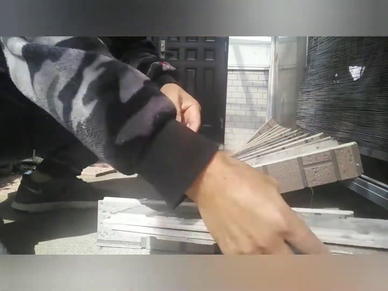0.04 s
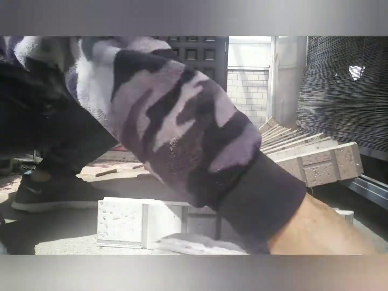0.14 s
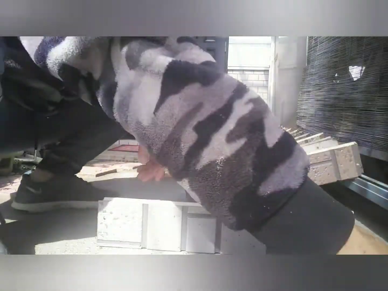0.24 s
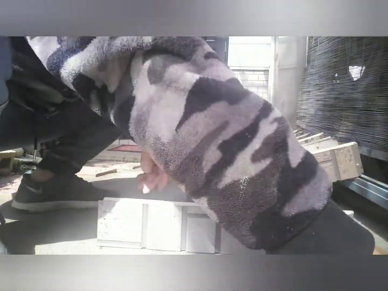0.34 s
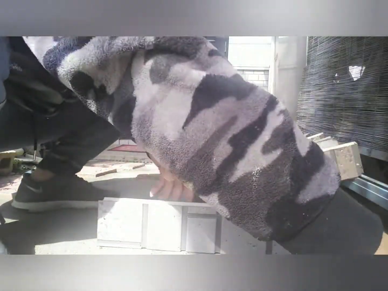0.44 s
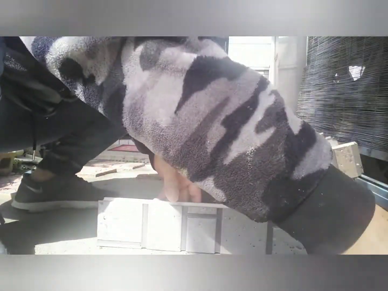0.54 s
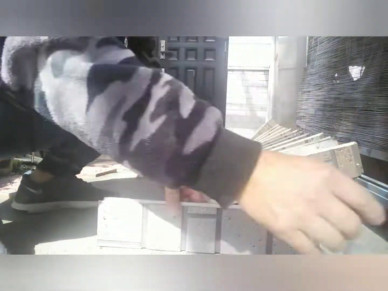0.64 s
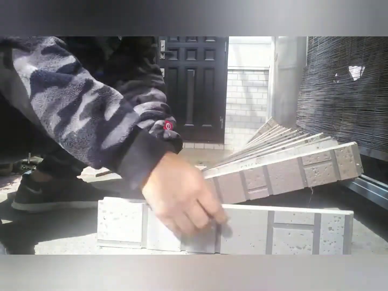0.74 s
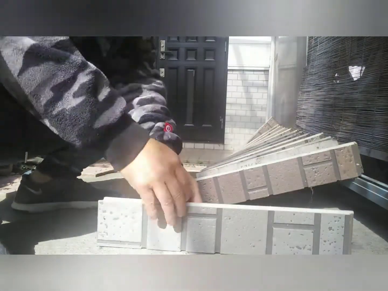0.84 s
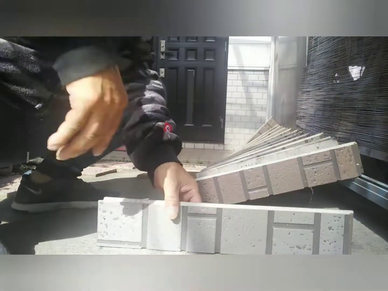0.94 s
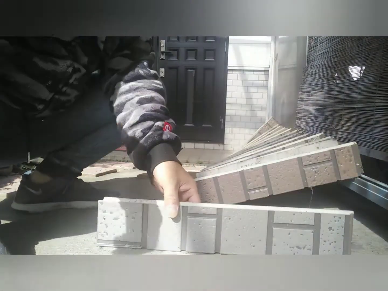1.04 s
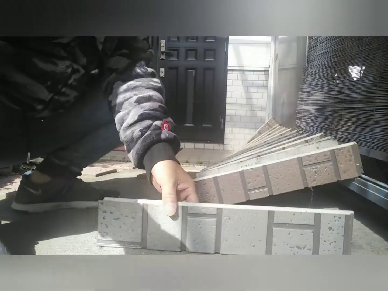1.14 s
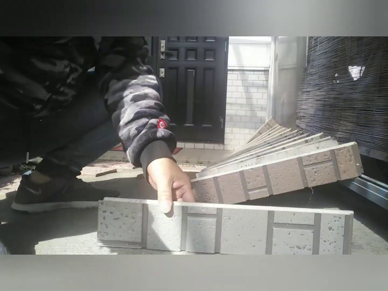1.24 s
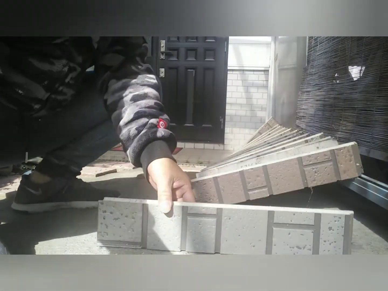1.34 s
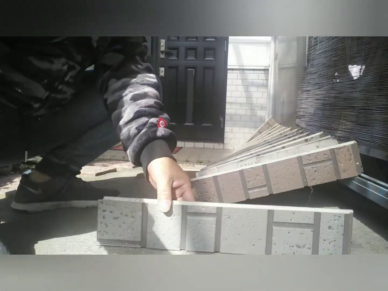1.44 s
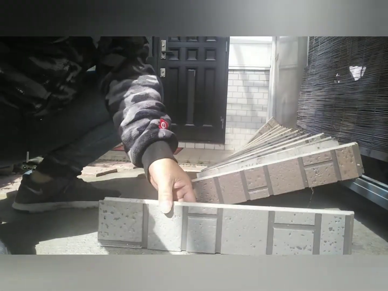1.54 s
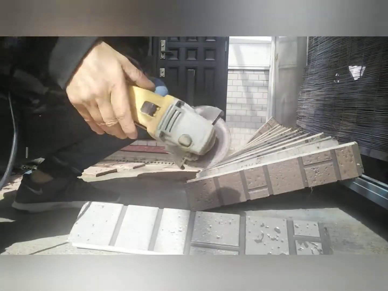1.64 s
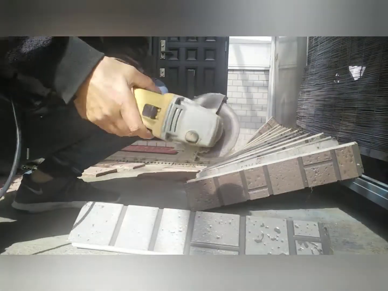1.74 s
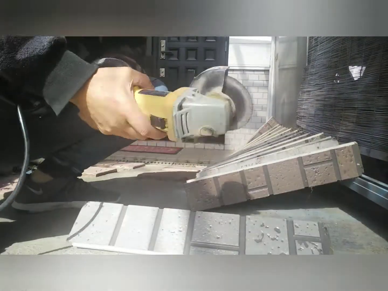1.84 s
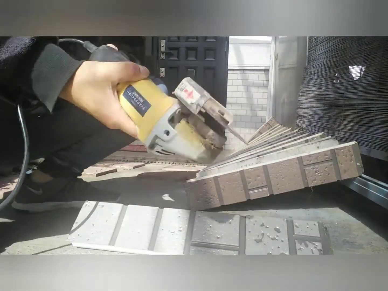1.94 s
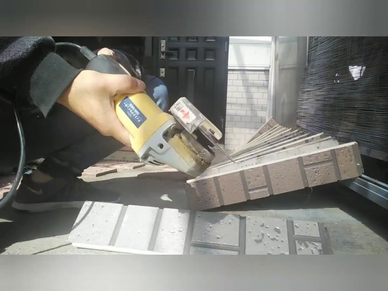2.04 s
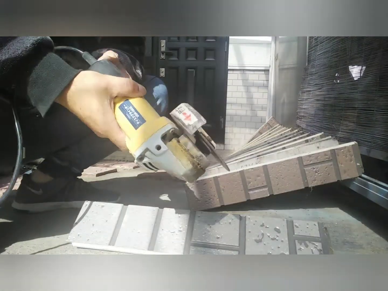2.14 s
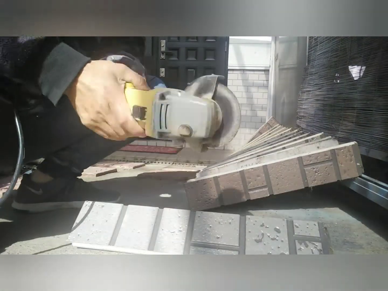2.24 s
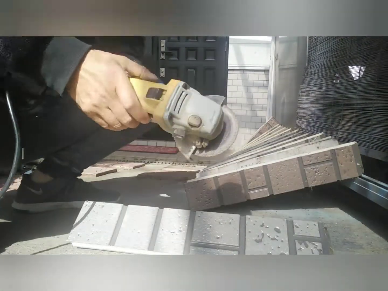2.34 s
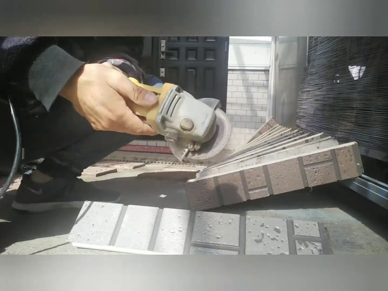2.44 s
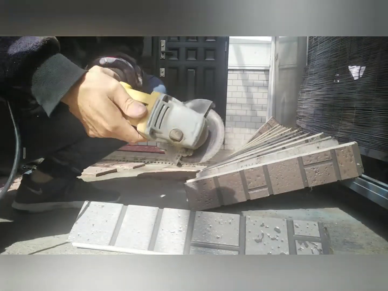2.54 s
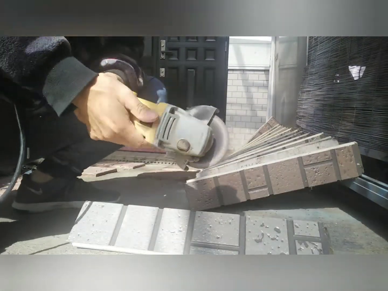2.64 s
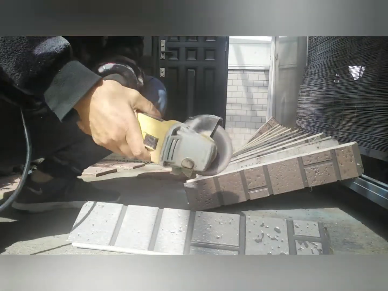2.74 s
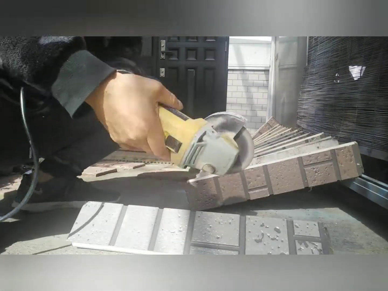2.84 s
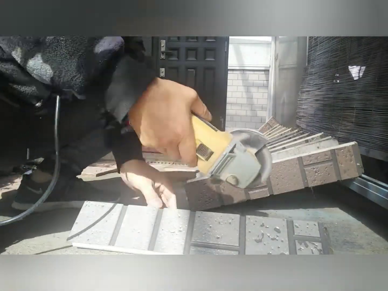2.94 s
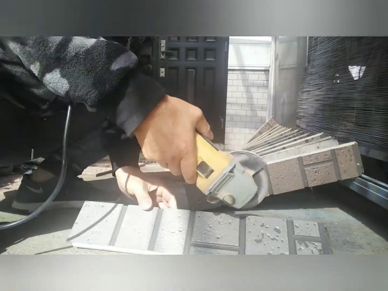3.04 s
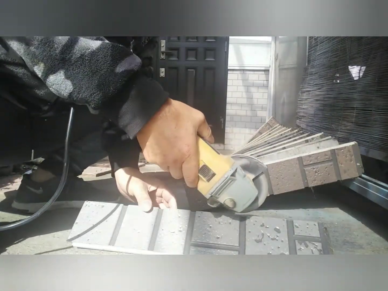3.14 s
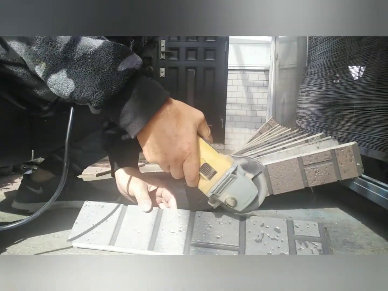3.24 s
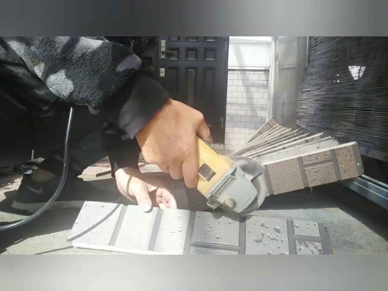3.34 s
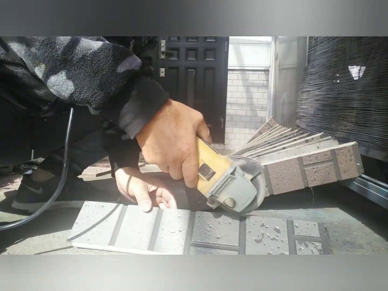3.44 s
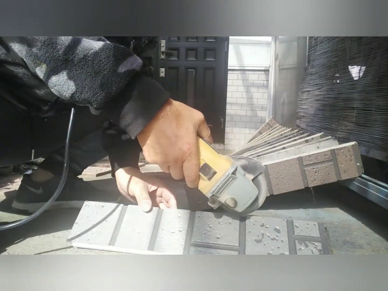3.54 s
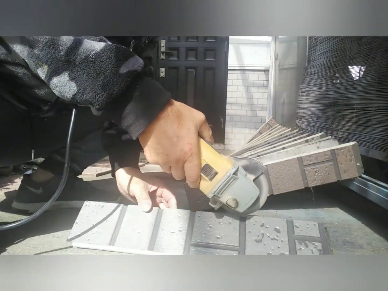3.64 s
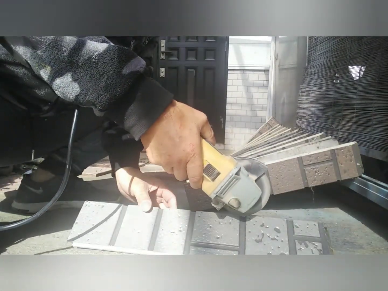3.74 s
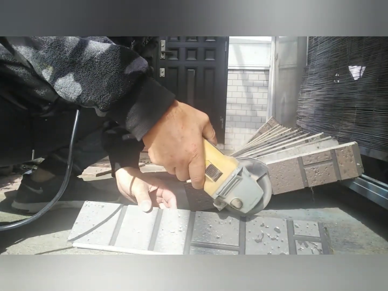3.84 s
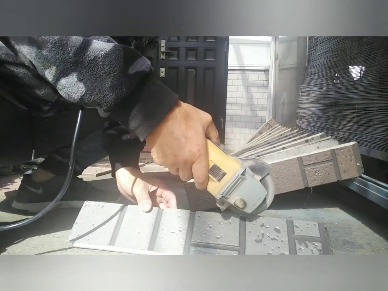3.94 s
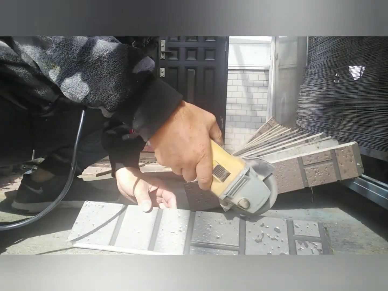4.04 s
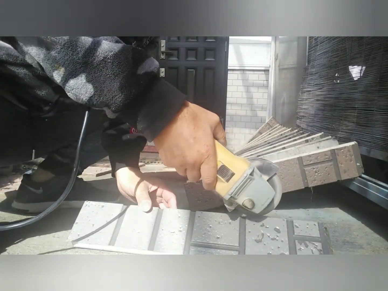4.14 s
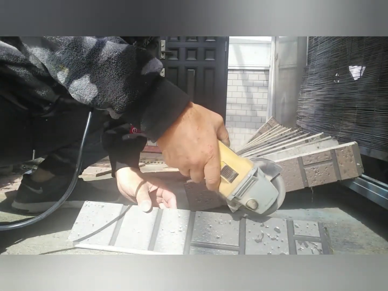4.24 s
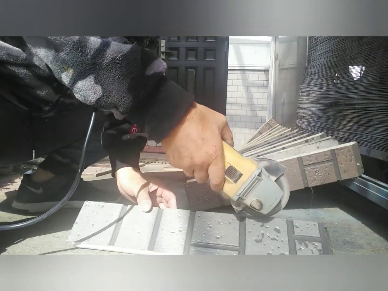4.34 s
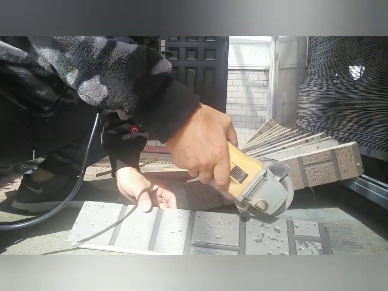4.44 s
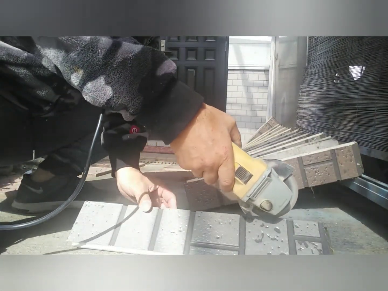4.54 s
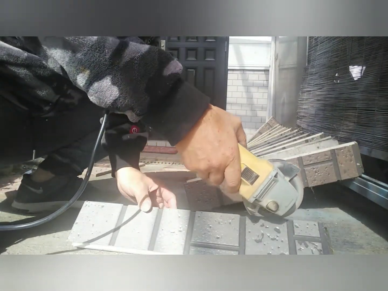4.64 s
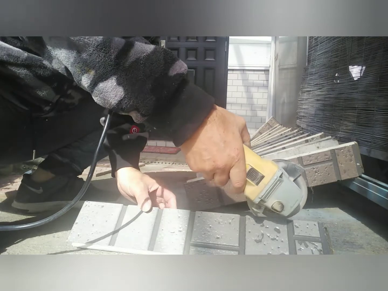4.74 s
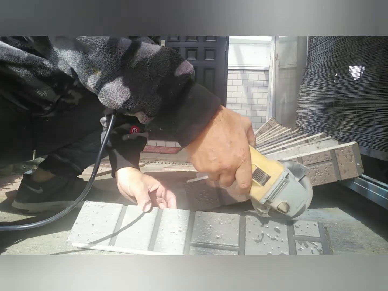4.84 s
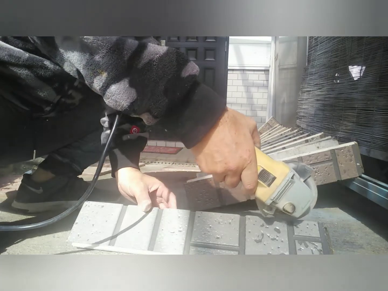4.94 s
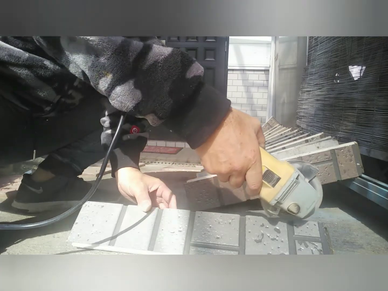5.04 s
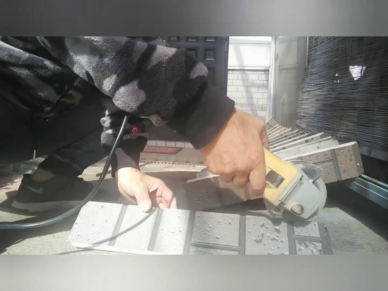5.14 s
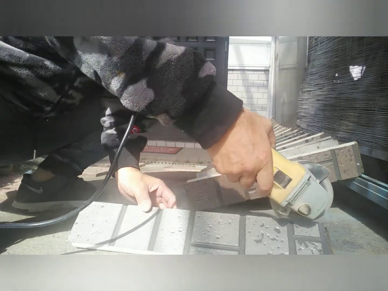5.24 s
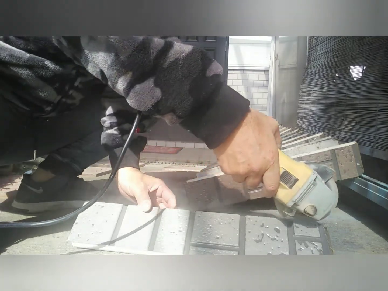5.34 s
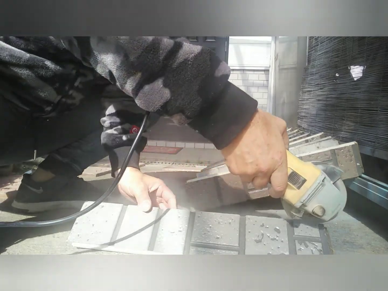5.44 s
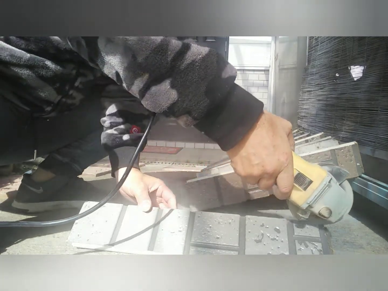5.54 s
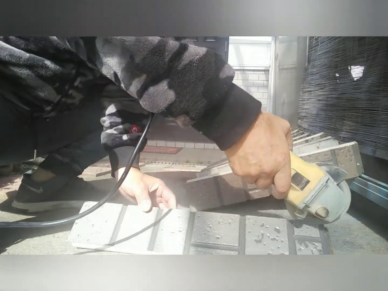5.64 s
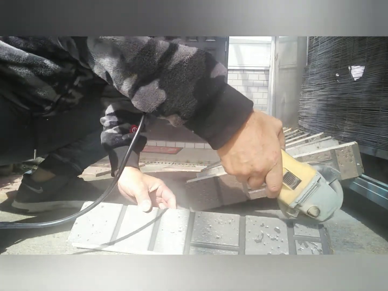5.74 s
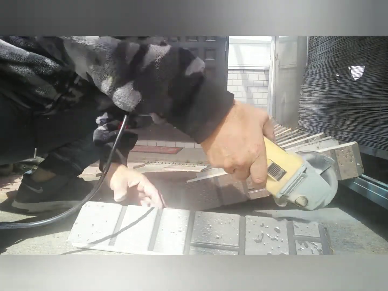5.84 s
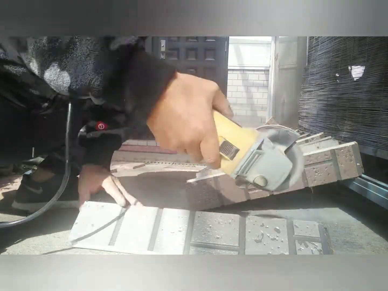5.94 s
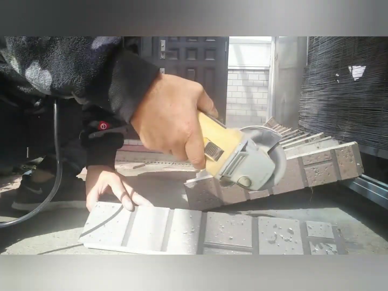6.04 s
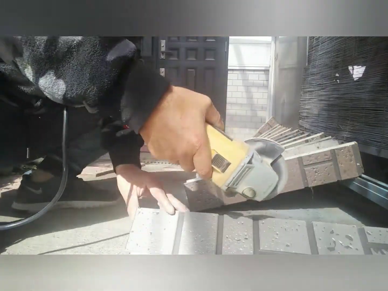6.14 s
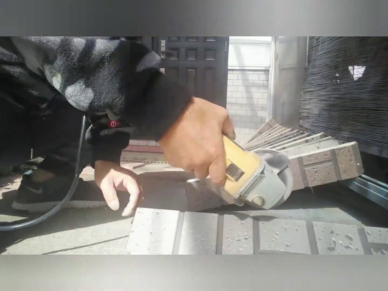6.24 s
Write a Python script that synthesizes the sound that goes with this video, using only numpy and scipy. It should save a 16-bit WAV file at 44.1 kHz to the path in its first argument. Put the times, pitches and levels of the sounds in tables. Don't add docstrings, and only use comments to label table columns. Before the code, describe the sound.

Faint thuds, clicks and gritty slides of siding boards over soft yard noise, ending in a bright hard clack. A momentary gap, then a calm second with light rustles. An angle grinder starts abruptly, far louder, its whine climbing and gears chattering; the disc snarls and stutters through a board, slowing, then runs free and briefly brushes it. Dry, close, mono.

```python
import sys
import numpy as np
from scipy import signal
from scipy.fft import rfft, irfft
from scipy.io import wavfile
from scipy.ndimage import uniform_filter1d

SR = 44100
rng = np.random.default_rng(int(sys.argv[2]) if len(sys.argv) > 2 else 0)


def transcribe(signal):
    frames = np.atleast_2d(signal).T
    limited = np.clip(frames, -1, 1)
    pcm = np.round(limited * 32767).astype(np.int16)
    wavfile.write(sys.argv[1], SR, pcm)


def decibels_to_gain(level_db):
    exponent = np.asarray(level_db, float) / 20
    return 10 ** exponent


N = 277830
T = np.arange(N) / SR

# time_s, bite_db on the board, nearness_db of the tool
WORK = [(2.575, -60, -5.5), (2.63, -42, 0), (3.05, -43.5, 1), (3.35, -34, 0), (3.56, -33.5, 1),
        (3.86, -27.5, 2.05), (4.17, -22, .7), (4.6, -21.5, -0.3), (5.0, -21.5, 0), (5.25, -22.5, 0),
        (5.46, -19.5, -0.8), (5.61, -23, 0.6), (5.77, -23.5, 1.2), (5.83, -50, -0.5), (6.0, -41, -0.5),
        (6.06, -31, -1), (6.13, -43, 0.2), (6.3, -48, 0)]
# time_s, loss_hz
SAG = [(3.52, 1), (3.8, 13), (4.05, 24), (4.25, 37), (4.4, 40), (4.55, 47), (4.68, 54), (4.85, 59),
       (4.98, 65), (5.1, 75), (5.22, 80), (5.3, 90), (5.46, 105), (5.55, 94), (5.6, 81), (5.65, 75),
       (5.72, 80), (5.785, 81)]
# time_s, fan_lift_db, commutator_lift_db
TONE_LIFT = [(2.62, -24, -10), (2.66, -24, 0), (2.74, -22, 2), (2.79, -1, 3), (2.95, 0, 3), (3.1, 0, -3),
             (3.5, 0, -3), (3.62, 0, 0), (5.55, 0, 0), (5.65, 0, 1), (5.85, -1, 0), (5.95, -3, -1),
             (6.1, -5, -3), (6.3, -6, 0)]
# pitch_hz, level_db
UNBALANCE = [(280, -65), (335, -48), (365, -35), (395, -36), (415, -30), (435, -36), (452, -38), (468, -35)]
FAN = [(1900, -44), (2500, -57), (2650, -33), (2750, -40.5), (2900, -27.5), (3000, -37.5), (3120, -43),
       (3270, -32)]
COMMUTATOR = [(4350, -35), (4520, -34), (4620, -39), (4800, -41), (5000, -43), (5300, -46), (5480, -40),
              (5600, -36)]
# armature_multiple, level_db
FAINT_ORDERS = [
    (2, -52.5),
    (4, -43.5),
    (5, -52),
    (13, -57),
]
# start_s, end_s, armature_multiple, level_db
SWEEPS = [
    (2.615, 2.656, 12, -35),
    (5.25, 5.5, 14, -37),
    (5.79, 5.923, 5, -42.5),
    (5.82, 6.1, 13, -39),
    (5.94, 6.2, 8, -40),
]
# pitch_hz, density_db per Hz
HOUSING = [(150, -56), (250, -21.5), (419, -13), (458, -17), (515, -21), (633, -12), (876, -21),
           (1380, -14), (3160, -6.5), (3460, -12), (5000, -13.5), (5620, -7.5), (6910, -24.5), (8500, -26),
           (11000, -15), (18700, -120)]
# pitch_hz, density_db per Hz
GRIT = [
    (5500, -47),
    (6500, -12),
    (7200, -12),
    (8500, -8.5),
    (10000, -4.5),
    (11400, 4.5),
    (12500, -2.5),
    (14000, -7),
    (16000, -10),
]
# pitch_hz, width_hz,
# level_db
BOARD = [(594, 247, -2), (727, 180, -2.5), (799, 88, 1), (1152, 220, -6.5), (1728, 205, -7.5),
         (2500, 280, -4), (4980, 410, -9), (6290, 350, -10)]
# pitch_hz, width_hz, level_db
STEEL = [(5280, 200, -19), (5750, 300, -15), (9300, 400, -22), (10750, 500, -12), (11800, 500, -12),
         (12900, 600, -14), (14000, 600, -15), (15200, 600, -13)]
# start_s, end_s, disc_multiple, level_db
DRUM = [(3.72, 4.1, 4, -38.5), (3.9, 4.55, 4, -31), (4.39, 5.35, 4, -35), (5.3, 5.62, 4, -29),
        (5.6, 5.8, 4, -37), (4.05, 4.93, 3.5, -39), (5.05, 5.45, 4.5, -39.5), (4.2, 4.5, 5, -41),
        (4.42, 4.95, 5, -31), (3.7, 4.05, 10.5, -42.5), (4.9, 5.15, 7.5, -43), (4.9, 5.3, 5, -36.5),
        (5.62, 5.8, 5, -36), (4.8, 5.0, 5.5, -37), (5.05, 5.35, 5.5, -40), (5.64, 5.78, 5.5, -38),
        (4.05, 4.3, 6, -39), (5.32, 5.6, 6, -27), (5.68, 5.8, 6, -43), (5.25, 5.45, 6.5, -41),
        (4.0, 4.7, 7, -37.5), (4.72, 4.9, 7, -39), (5.05, 5.55, 7, -43), (5.1, 5.6, 8, -39),
        (5.62, 5.82, 8, -39.5), (5.33, 5.6, 9, -34.5), (4.05, 4.61, 10, -39.5), (4.05, 4.5, 11, -39),
        (4.5, 5.0, 11, -36), (3.75, 4.73, 13, -39.5), (5.35, 5.6, 13, -41), (5.62, 5.8, 12, -37.5),
        (3.56, 3.85, 14, -33), (3.9, 4.05, 14, -37), (4.55, 4.7, 14, -39), (4.35, 4.7, 15, -41),
        (5.02, 5.28, 15, -35.5), (4.05, 4.5, 16, -38.5), (4.45, 5.0, 16, -37), (3.75, 4.15, 17, -36),
        (4.65, 5.0, 17, -39), (5.12, 5.35, 17, -40), (4.42, 4.58, 18, -34), (5.25, 5.55, 18, -35.5),
        (5.35, 5.6, 19, -35.5), (5.7, 5.82, 18, -33)]
# time_s, peak_db
GEAR_KNOCKS = [(2.5803, -22), (2.5903, -14), (2.6302, -15), (2.7526, -10), (2.7699, -13), (2.7968, -12),
               (2.8158, -14), (2.8747, -15), (2.8951, -12), (2.904, -16), (2.9213, -12), (2.9839, -16),
               (3.0737, -16), (3.1236, -17), (3.1905, -16), (3.2154, -19), (3.288, -17), (3.3735, -10),
               (3.4174, -15), (3.4948, -10), (3.638, -15), (3.6559, -14), (3.7053, -12), (3.804, -12),
               (5.858, -17),
    (5.958, -17),
    (6.046, -17),
    (6.205, -21),
]
# time_s, peak_db
SNATCHES = [(3.786, -18), (3.805, -14), (3.822, -16), (3.846, -12), (3.89, -18), (3.914, -12.5),
            (3.981, -17), (4.009, -17), (4.035, -14), (4.05, -12), (4.097, -14), (4.12, -12), (4.145, -13),
            (4.192, -15), (4.21, -8), (4.254, -15), (4.291, -14), (4.331, -11), (4.351, -11), (4.422, -16),
            (4.447, -13), (4.474, -14), (4.498, -9), (4.519, -11), (4.615, -15), (4.638, -8), (4.681, -12),
            (4.702, -8), (4.742, -25), (4.755, -8.5), (4.794, -13), (4.821, -9), (4.84, -12), (4.864, -12),
            (4.912, -16), (4.929, -10.5), (4.961, -12), (4.981, -8), (5.005, -12), (5.029, -13),
            (5.054, -9.5), (5.14, -9), (5.168, -10), (5.28, -17), (5.307, -14), (5.327, -10), (5.422, -7),
            (5.451, -10), (5.466, -10), (5.49, -10), (5.513, -8), (5.64, -13), (5.675, -12), (5.704, -15),
            (5.745, -12), (5.793, -15)]
# time_s, lift_db
GUSTS = [
    (3.345, 6),
    (3.86, 5.5),
    (4.7, 6.5),
    (4.93, 6),
    (5.35, 0.5),
]
# time_s, peak_db, thud_hz, ring_hz, crack_db
KNOCKS = [(0.279, -35, 290, 2640, -16), (0.288, -20, 520, 583, -9), (0.292, -22, 334, 692, -11),
          (0.461, -39, 164, 1810, -13), (0.49, -40, 170, 824, -15), (0.516, -23, 233, 2330, -4),
          (0.527, -34, 549, 1860, -6), (0.546, -36, 261, 660, -9.5), (0.611, -56, 151, 851, -13),
          (0.796, -43, 151, 706, -0.5), (0.915, -34, 236, 705, -17.5), (0.951, -49, 239, 608, -32),
          (1.004, -37, 220, 700, -24), (1.348, -46, 186, 550, -22)]
# pitch_hz, density_db per Hz
CRACK = [(240, -48), (400, -13), (1430, -2), (2380, -2), (3000, -5.5), (5720, -7), (7670, -44),
         (11100, -26.5), (15800, -40)]
# pitch_hz, level_db, t60_s
DROP = [(550, -1.5, 0.033), (1200, -14, 0.024), (2190, 0, 0.031), (3780, -14, 0.022), (4530, -12, .02),
        (6380, -2, 0.019), (11100, -0.5, 0.02), (11260, -5, 0.024)]
# start_s, end_s, pitch_hz, width_hz, level_db
SCRAPES = [(0.281, 0.284, 1657, 2500, -54), (0.306, 0.333, 600, 800, -60), (0.42, 0.474, 4700, 1200, -58),
           (0.443, 0.513, 1200, 1600, -57.5), (0.514, 0.574, 800, 900, -53.5),
           (0.597, 0.755, 836, 300, -62), (.92, 0.996, 300, 280, -57), (1.095, 1.321, 830, 900, -75),
           (1.12, 1.25, 4500, 1000, -76), (1.382, 1.441, 67, 50, -38.5), (1.386, 1.48, 296.3, 407.4, -53),
           (1, 1.025, 790, 400, -55), (1.42, 1.475, 140, 151.2, -44), (-.05, 0.074, 900, 1200, -71),
           (0.79, 0.822, 3520, 2500, -51), (0.794, 0.83, 700, 138.9, -57), (1.37, 1.416, 1990, 600, -70),
           (1.438, 1.477, 2250, 250, -58), (1.439, 1.47, 1200, 400, -62), (1.415, 1.45, 5600, 1200, -68),
           (1.508, 1.548, 450, 400, -55), (1.51, 1.552, 2000, 500, -64)]
# start_s, end_s, pitch_hz, width_hz, level_db
BRUSH = [
    (6.025, 6.115, 660, 170, -29),
    (6.02, 6.11, 830, 150, -34),
    (6.03, 6.12, 1120, 120, -42),
]
# start_s, end_s, level_db
RUSTLES = [(-.06, 0.106, -68.5), (.33, .38, -59), (0.366, 0.485, -62), (0.486, 0.587, -59),
           (0.576, 0.784, -65), (0.78, 0.974, -63.5), (1.087, 1.34, -70), (1.39, 1.474, -73),
           (1.48, 1.58, -74), (1.59, 1.747, -77), (1.75, 1.802, -66), (1.788, 1.892, -67.5),
           (2.17, 2.243, -71), (2.22, 2.352, -72.5), (2.382, 2.459, -69.5)]
# pitch_hz, density_db per Hz
RUSTLE = [(760, -42.5), (1300, -19), (1440, -2), (3770, 1.5), (5010, 4.5), (7760, -14.5), (11100, 7.5),
          (13400, -8), (15000, -19), (15800, -46)]
# time_s, level_db
BUMPS = [(.298, -52), (.538, -59), (.618, -59), (.824, -65), (1.02, -55), (1.398, -49), (1.505, -44),
         (1.73, -69), (1.87, -64), (2.42, -71), (2.535, -60)]
# pitch_hz, density_db per Hz
YARD = [(18, -50.5), (30, -19), (79, -5), (165, -16.5), (382, -23), (435, -27.5), (755, -28.5), (883, -28),
        (955, -32), (6650, -43.5), (13500, -34), (14600, -26), (15800, -28.5)]
BUSY = [(88, -34.5), (150, -7.5), (543, -15), (1050, -17), (1250, -23), (3880, -25), (7250, -41),
        (10900, -20.5), (13500, -24), (14600, -14.5), (15800, -24.5)]
# start_s, end_s
SCENE_GAP = (1.577, 1.601)

DISC_RATIO = .3826
START_S, RELEASE_S = 2.575, 5.785


def grinder():
    hz = speed()
    bite_db, near_db = curves(WORK)
    bite_db = bite_db + 0.72 * walk(18)
    turns = np.cumsum(hz) / SR
    disc_turns = DISC_RATIO * turns
    knock_db = clatter(disc_turns, bite_db)

    unbalance_db = radiated(hz, UNBALANCE) + near_db
    fan_db = radiated(7 * hz, FAN) + near_db
    commutator_db = radiated(12 * hz, COMMUTATOR) + near_db
    free = np.clip(-(bite_db + 32) / 6, 0, 1)
    commutator_db += (-37 + near_db - commutator_db) * free
    fan_lift_db, commutator_lift_db = curves(TONE_LIFT)
    fan_db += fan_lift_db
    commutator_db += commutator_lift_db

    whirr_db = -24.5 + near_db + knock_db
    hiss_db = -24 + 0.15 * (bite_db + 21) + near_db + knock_db
    tool = motor(turns, unbalance_db, fan_db, commutator_db, whirr_db, bite_db)
    tool += disc(disc_turns, bite_db, hiss_db)
    tool += strands(turns, SWEEPS, 0.5) + jolts()
    on = np.clip((T - 2.572) / 0.013, 0, 1)
    return on * (tool + draught(bite_db))


def speed():
    def lag(since, lag_s=.131):
        return np.exp(-np.maximum(T - since, 0) / lag_s)

    run_up = 467.5 - 234 * lag(START_S) - 220 * lag(START_S, .027)
    return run_up - curves(SAG)[0] * lag(RELEASE_S)


def motor(turns, unbalance_db, fan_db, commutator_db, whirr_db, bite_db):
    strain = np.clip((bite_db + 45) / 20, .2, 1)
    tones = decibels_to_gain(unbalance_db + 2.5 * strain * walk(30)) * np.sin(2 * np.pi * turns + .5 * strain * walk(25))
    tones += decibels_to_gain(fan_db + 1.5 * walk(40)) * np.sin(2 * np.pi * 7 * turns + .55 * walk(60))

    smear = .75 * walk(150)
    sides = sum(np.sin(2 * np.pi * (12 + s * DISC_RATIO) * turns + smear) for s in (-1, 1))
    side_db = -8 - np.maximum(bite_db + 40, 0)
    bars = np.sin(2 * np.pi * 12 * turns + smear) + decibels_to_gain(side_db) * sides
    tones += decibels_to_gain(commutator_db + 2.5 * walk(60) + walk(12)) * bars

    wobble = 1.2 * np.sin(2 * np.pi * DISC_RATIO * turns)
    mesh = np.sin(2 * np.pi * 14 * turns + wobble + walk(150))
    tones += decibels_to_gain(.5 * (commutator_db + bite_db) - 11 + 3 * walk(8)) * mesh

    faint_db = unbalance_db + 34.5 - np.maximum(bite_db + 35.5, 0)
    for multiple, db in FAINT_ORDERS:
        tones += decibels_to_gain(db + faint_db + 2 * walk(12)) * np.sin(2 * np.pi * multiple * turns)

    air = rng.standard_normal(N) * decibels_to_gain(0.66 * walk(25.136))
    rattle = between(grains(600, 0.5, 0.0014), 2140, 4700)
    whirr = level(colour(air + decibels_to_gain(-2) * rattle, HOUSING), -2.8)
    return np.sqrt(2) * tones + decibels_to_gain(whirr_db) * whirr


def radiated(hz, points):
    return np.interp(hz, *np.transpose(points))


def clatter(disc_turns, bite_db):
    mains = np.cos(4 * np.pi * 60 * (T - 2.6385)) * np.exp(-np.maximum(T - START_S, 0) / 0.15)
    free = np.clip(-(bite_db + 22.5) / 12, 0, 1)
    fourth = np.cos(2 * np.pi * (disc_turns / 4 - 0.53) + 1.2 * walk(17)) * free
    return 2.5 * mains + 1.5 * fourth


def disc(disc_turns, bite_db, hiss_db):
    chatter = grains(2000, 1.4, .001)
    board = np.zeros(N)
    for k, (hz, width, db) in enumerate(BOARD):
        board += (-1) ** k * decibels_to_gain(db) * band(band(chatter, hz, width), hz, 2 * width)

    grit = rng.standard_normal(N) * decibels_to_gain(walk(45)) + decibels_to_gain(-8) * grains(600, 1.8, .0015)
    sizzle = level(between(grains(4000, 1.9, 0.00089), 13000, 17600), 0)
    sizzle *= decibels_to_gain(0.56 * (bite_db + 28.5) - 7.5 + .7 * walk(30))
    hiss = level(colour(grit, GRIT), 0) + sizzle + steel(bite_db)

    drumming = strands(disc_turns, DRUM, 0.48)
    return decibels_to_gain(bite_db) * level(board, -5.5) + drumming + decibels_to_gain(hiss_db) * level(hiss, -0.017)


def steel(bite_db):
    out = np.zeros(N)
    for hz, width, db in STEEL:
        mode = level(band(band(rng.standard_normal(N), hz, width), hz, width), db)
        out += mode * decibels_to_gain(2.5 * walk(5.5) + 2 * walk(40))
    return decibels_to_gain(bite_db + 19) * out


def strands(turns, rows, wobble):
    flutter = [(1.5 * walk(25), wobble * walk(25)) for _ in range(6)]
    out = np.zeros(N)
    for start, end, multiple, db in rows:
        halves = round(2 * multiple)
        swing_db, slip = flutter[halves // 2 % 6]
        tone = np.sin(np.pi * halves * turns + slip + halves ** 2)
        out += decibels_to_gain(db + swing_db) * spell(start, end, .2) * tone
    return np.sqrt(2) * out


def jolts():
    t = T[:700]
    casing = between(rng.standard_normal(len(t)) * t * np.exp(-t / .001), 2300, 4400)
    push = t * np.exp(-t / .00012)
    board = np.zeros(len(t))
    for k, (hz, width, db) in enumerate(BOARD):
        board += (-1) ** k * decibels_to_gain(db) * band(push, hz, 2.26 * width)
    gears = blows(GEAR_KNOCKS, casing, -5)
    return gears + blows(SNATCHES, board, -5) + blows(SNATCHES, casing, -8)


def blows(rows, shape, offset_db):
    train = np.zeros(N)
    for s, db in rows:
        train[int(s * SR)] = decibels_to_gain(db + offset_db)
    return signal.fftconvolve(train, shape / np.abs(shape).max())[:N]


def draught(bite_db):
    db = -40.5 + 0.44 * (bite_db + 23) + sum(lift * bump(s, 0.026) for s, lift in GUSTS)
    buffet = between(rng.standard_normal(N), 43, 427) * decibels_to_gain(0.88 * walk(13))
    return decibels_to_gain(db) * level(buffet, -0.44)


def knocks():
    out, t = np.zeros(N), T[:4000]
    for s, db, thud_hz, ring_hz, crack_db in KNOCKS:
        burst = np.exp(-t / 0.0034) + 0.22 * np.exp(-t / 0.012)
        crack = colour(rng.standard_normal(len(t)) * burst, CRACK)
        hit = decibels_to_gain(crack_db + 10) * crack / np.abs(crack).max()
        hit += decibels_to_gain(-3.5) * ring(ring_hz, 0.031, t)
        thud_db = -3.5 - 0.82 * (crack_db + 10.5)
        hit += decibels_to_gain(thud_db) * ring(thud_hz, 0.036, t) * np.minimum(t / 0.0017, 1)
        start = int(s * SR)
        out[start:start + len(t)] += decibels_to_gain(db - 6) * hit
    return out


def hard_drop():
    out, t = np.zeros(N), T[:4000]
    drop = sum(decibels_to_gain(db) * ring(hz, t60, t) for hz, db, t60 in DROP)
    crack = level(colour(rng.standard_normal(len(t)), CRACK), 0) * np.exp(-t / 0.0089)
    drop = drop / np.abs(drop).max() + decibels_to_gain(-26.5) * crack
    u = t / 0.0115
    boom = decibels_to_gain(-26.5) * u ** 2 * np.exp(2 - 2 * u) * np.sin(2 * np.pi * 170 * t)
    start = int(1.4865 * SR)
    out[start:start + len(t)] = decibels_to_gain(-18) * drop + boom
    return out


def scrapes():
    out, grit = np.zeros(N), grains(1800, 1.3, 0.0024)
    for start, end, hz, width, db in SCRAPES + BRUSH:
        out += level(band(band(grit, hz, width), hz, width), db + 1) * stroke(start, end, 0.35)
    return out


def sleeves():
    rustle = level(colour(grains(2500, 1.9, 0.0034), RUSTLE), 0)
    return rustle * sum(decibels_to_gain(db) * spell(start, end, 0.31) for start, end, db in RUSTLES)


def handling():
    width_s = 0.024
    gain = decibels_to_gain(np.where(T < SCENE_GAP[1], -63, -80)) + sum(decibels_to_gain(db) * bump(s, width_s) for s, db in BUMPS)
    return gain * (T < START_S + width_s) * level(between(rng.standard_normal(N), 33, 137), -1.4)


def yard():
    calm = level(colour(rng.standard_normal(N), YARD), -66.5) * decibels_to_gain(0.43 * walk(6.1))
    capsule = level(band(band(rng.standard_normal(N), 14650, 500), 14650, 500), -79)
    busy = level(colour(grains(3000, 1.5, .003), BUSY), -65) * decibels_to_gain(walk(8))
    return calm + capsule + busy * (T < SCENE_GAP[1])


def grains(rate, spread_db, tail_s):
    size = np.minimum(rng.exponential(size=N), 3)
    puffs = (rng.random(N) < rate / SR) * decibels_to_gain(spread_db * size)
    flare = signal.lfilter([1], [1, -np.exp(-1 / (tail_s * SR))], puffs)
    return level(rng.standard_normal(N) * flare, 0)


def walk(rate):
    k = max(int(SR / rate), 201)
    held = rng.standard_normal(N // 200)[np.arange(N) // k]
    return 1.3 * uniform_filter1d(uniform_filter1d(held, k), k)


def ring(hz, t60, t):
    return np.sin(2 * np.pi * hz * t) * np.exp(-np.log(1000) * t / t60)


def band(x, hz, width_hz):
    return signal.lfilter(*signal.iirpeak(hz, hz / width_hz, fs=SR), x)


def between(x, lo_hz, hi_hz):
    return signal.sosfilt(signal.butter(2, [lo_hz, hi_hz], "band", fs=SR, output="sos"), x)


def colour(x, points):
    hz, db = np.transpose(points)
    grid = np.arange(1025) * SR / 2048 + 1
    c = irfft(np.interp(np.log(grid), np.log(hz), db) * np.log(10) / 20)
    c[1:1024] *= 2
    c[1025:] = 0
    return signal.fftconvolve(x, irfft(np.exp(rfft(c))))[:len(x)]


def level(x, db):
    return x * decibels_to_gain(db) / np.sqrt(np.mean(x ** 2))


def curves(rows):
    s, *columns = np.transpose(rows)
    return [np.interp(T, s, c) for c in columns]


def spell(start, end, edge):
    return np.sin(np.pi / 2 * np.clip(np.minimum(T - start, end - T) / (edge * (end - start)), 0, 1)) ** 2


def stroke(start, end, attack):
    u = np.clip((T - start) / (end - start), 0, 1)
    return np.sin(np.pi / 2 * np.minimum(u / attack, (1 - u) / (1 - attack))) ** 2


def bump(s, width_s):
    return np.exp(-((T - s) / width_s) ** 2)


def scene():
    mono = grinder() + knocks() + hard_drop() + scrapes() + sleeves() + handling() + yard()
    return np.array([mono, mono])


def roll_off(x):
    return signal.sosfilt(signal.butter(12, 16910, fs=SR, output="sos"), x)


def record(dry):
    gap = np.clip(np.maximum(SCENE_GAP[0] - T, T - SCENE_GAP[1]) / 0.0028, 0, 1)
    top_cut = signal.ellip(14, .3, 70, 15760, fs=SR, output="sos")
    mix = signal.sosfilt(top_cut, dry * gap)
    return roll_off(mix)


dry = scene()
out = record(dry)
transcribe(out)
```